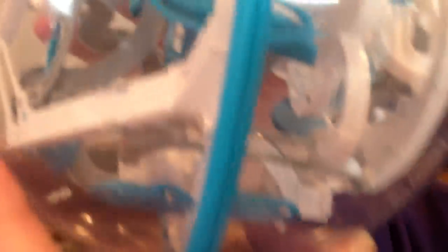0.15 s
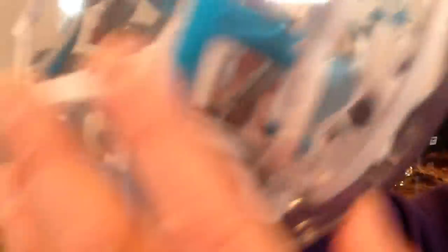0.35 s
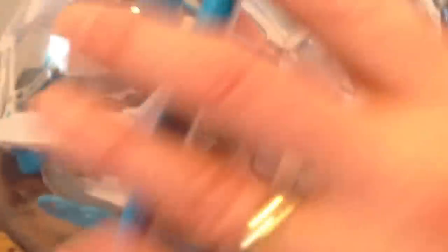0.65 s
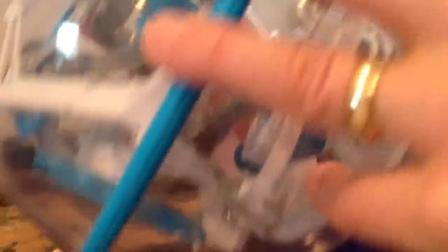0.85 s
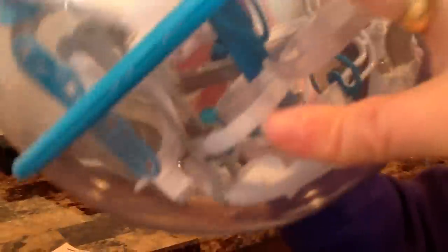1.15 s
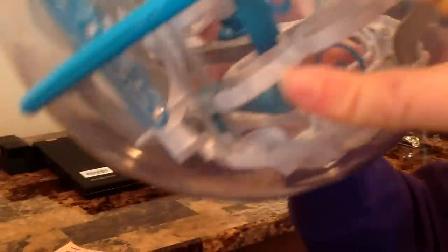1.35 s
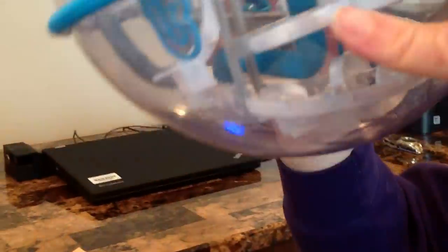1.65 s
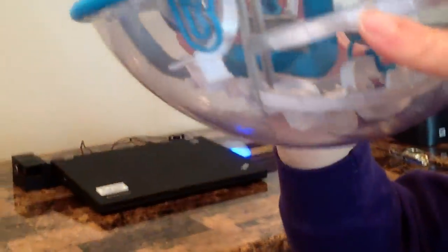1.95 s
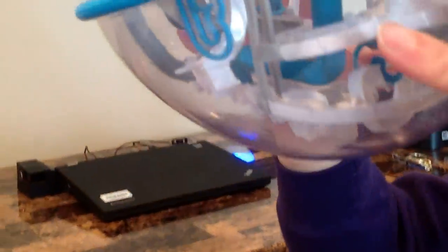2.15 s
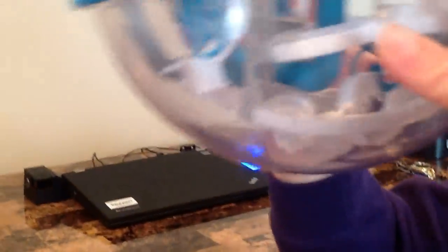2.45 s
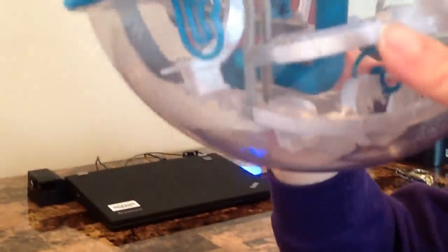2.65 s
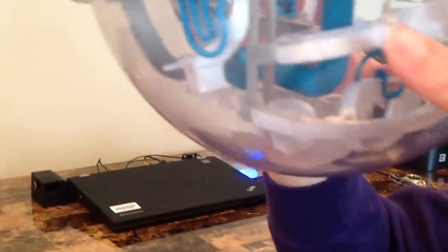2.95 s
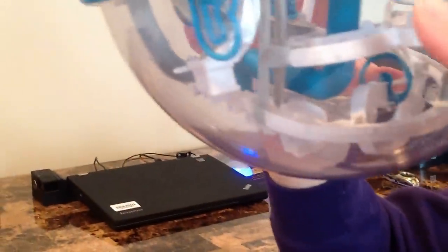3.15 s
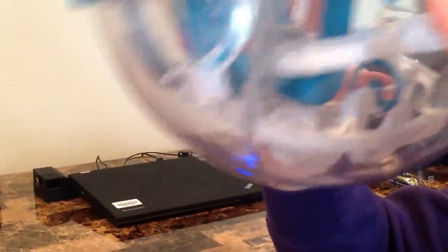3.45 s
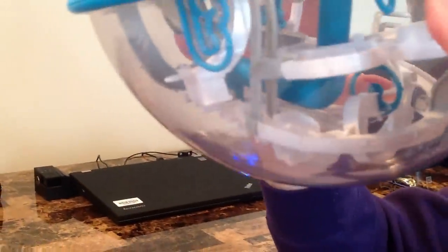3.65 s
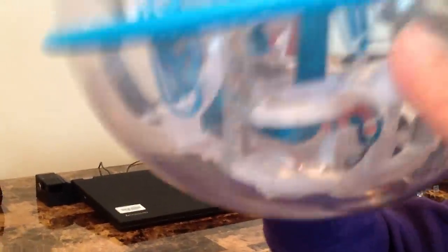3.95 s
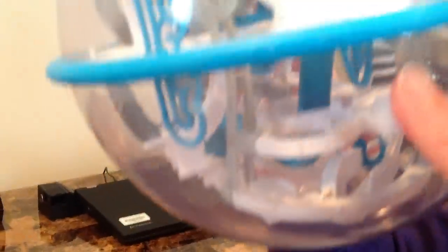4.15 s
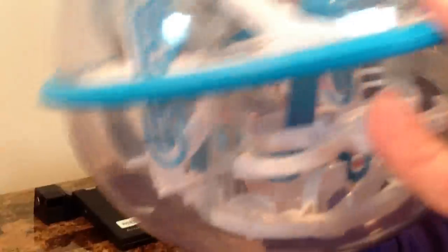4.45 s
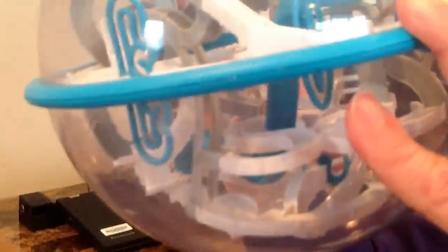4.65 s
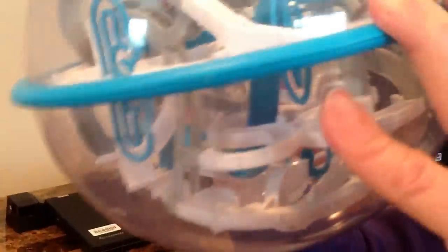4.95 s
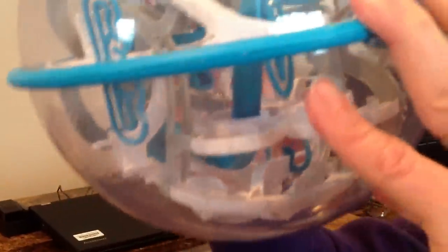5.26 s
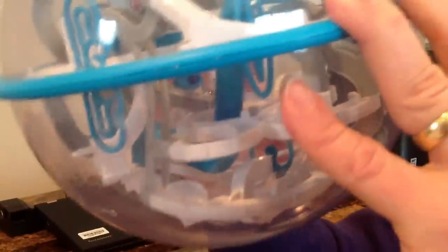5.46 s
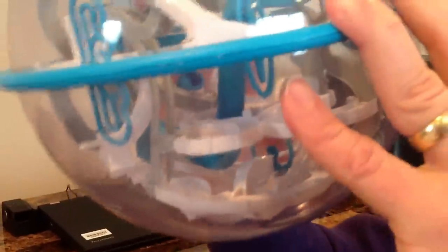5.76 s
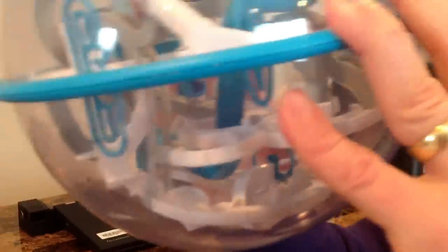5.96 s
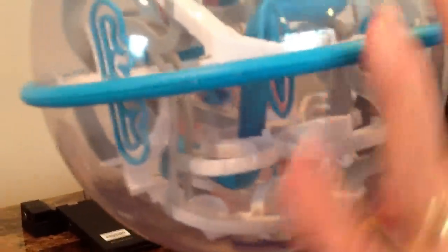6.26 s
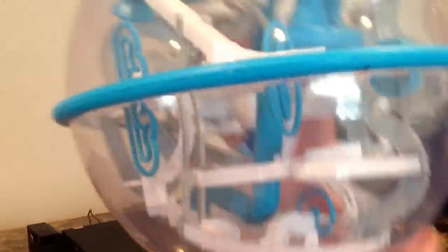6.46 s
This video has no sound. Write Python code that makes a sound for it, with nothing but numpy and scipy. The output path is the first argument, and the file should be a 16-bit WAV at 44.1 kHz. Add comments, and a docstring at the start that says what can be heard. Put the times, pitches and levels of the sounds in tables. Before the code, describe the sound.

Irregular hard plastic clacks and short rattling rolls of a ball in a hand-held maze ball, close up over steady faint hiss.

```python
"""A steel ball rolls and knocks inside a clear plastic maze sphere turned in the hands, close to a phone.
Each knock is a blow of shell modes and damped noise, coloured by the struck track; bounces follow it.
Rolling strings soft blows together. A hand changes its grip, mostly early on: fingers tick, rub and thud
as shaped noise and small skin contacts. A small, quiet room adds a short tail, steady hiss and a faint hum."""
import sys
import numpy as np
from scipy import signal
from scipy.fft import rfft, irfft, next_fast_len
from scipy.io import wavfile

SR = 44100
rng = np.random.default_rng(int(sys.argv[2]) if len(sys.argv) > 2 else 0)


def inscribe(sig):
    """Save sig as 16-bit PCM at rate SR to the path in sys.argv[1].

    A 1-D sig is mono; a 2-D sig holds one channel per row.
    Samples are clipped to [-1, 1] before scaling.
    """
    pcm = np.round(np.clip(np.atleast_2d(sig).T, -1, 1) * 32767)
    wavfile.write(sys.argv[1], SR, pcm.astype(np.int16))


N = 291819
BLOW_LENGTH = 5120  # samples in one blow or tick


def undb(db):
    """Decibels to gain."""
    return np.exp(np.asarray(db) * (np.log(10) / 20))


def unit(x, span=None):
    """Scale to rms 1 over the first span seconds, or over all."""
    head = x if span is None else x[:int(span * SR)]
    return x / np.sqrt(np.mean(head ** 2) + 1e-20)


def along(hz, points):
    """Read (Hz, value) points on a log-frequency axis."""
    point_hz, value = np.transpose(points)
    return np.interp(np.log(hz + 1), np.log(point_hz), value)


def colour(x, points):
    """Give a sound the spectrum of (Hz, dB) points in minimum phase, so nothing rings ahead of it."""
    size = 2 * next_fast_len(len(x) // 2 + 1)
    gain = undb(along(np.fft.rfftfreq(size, 1 / SR), points))
    # fold the cepstrum forward in time for minimum phase
    cepstrum = irfft(np.log(gain))
    cepstrum[1:size // 2] *= 2
    cepstrum[size // 2 + 1:] = 0
    response = np.exp(rfft(cepstrum))
    return irfft(rfft(x, size) * response, size)[:len(x)]


def add(track, s, sound):
    """Mix a sound into a track at time s."""
    i = int(np.clip(s * SR, 0, N - 1))
    track[i:i + len(sound)] += sound[:N - i]


def swell(t, length):
    """A smooth rise and fall over length seconds."""
    return np.sin(np.pi * np.clip(t / length, 0, 1))


def ring_track(x, rings_hz, q):
    """A track is resonant: sum the sound through one peak filter per ring frequency."""
    return sum(signal.lfilter(*signal.iirpeak(hz, q, fs=SR), x) for hz in rings_hz)


def grains(rate, spread_db):
    """One second of tiny contacts, rate per second on average, of uneven size and spacing."""
    gap = rng.random(SR // 8)
    side, strength = rng.standard_normal((2, SR // 8))
    at = (np.cumsum(2 * gap) * SR / rate).astype(int)
    return np.bincount(at, np.sign(side) * undb(spread_db * strength), SR)[:SR]


# Still air and microphone hiss. Each row: frequency in Hz, relative density in dB per Hz.
AIR_SPECTRUM = [(25, -51), (60, -25), (90, -18), (125, -6), (200, -2), (310, -3.5), (450, -6), (1000, -9),
                (2900, -12), (6000, -14), (11000, -14), (15500, -19)]
AIR_DB = -62.5
HUM_HZ, HUM_DB = 118.2, -80.5


def background(waver=0.97):
    """Steady coloured hiss and a faint sine hum whose phase wanders (waver in radians)."""
    t = np.arange(N) / SR
    drift = np.interp(t, np.linspace(0, t[-1], 40), rng.standard_normal(40))
    hum = np.sin(2 * np.pi * HUM_HZ * t + waver * drift)
    hiss = colour(rng.standard_normal(N), AIR_SPECTRUM)
    return undb(AIR_DB) * unit(hiss) + undb(HUM_DB) * unit(hum)


def dying_noise(spectrum, t60s, size):
    """A diffuse tail: half-octave bands of noise, each with its own energy and decay."""
    t, f = np.arange(size) / SR, np.fft.rfftfreq(size, 1 / SR)
    noise, out = rfft(rng.standard_normal(size)), 0
    for hz in 2 ** np.arange(6, 14.5, .5):
        fade = undb(-60 * t / along(hz, t60s))
        in_band = abs(np.log2((f + 1) / hz)) < .25
        band = irfft(noise * in_band, size) * fade
        energy_gain = np.sqrt(hz * np.mean(fade ** 2))  # wider and longer bands hold more energy
        out = out + unit(band) * energy_gain * undb(along(hz, spectrum))
    return out


# Tone of the room tail. Each row: frequency in Hz, relative level in dB.
ROOM_SPECTRUM = [(60, -3), (160, 8.5), (350, 4.5), (700, 5.5), (1200, -4), (2200, -3), (3200, -2),
                 (8000, 0), (15000, -35)]
# Decay of the room tail. Each row: frequency in Hz, time to fall 60 dB in seconds.
ROOM_DECAY = [(150, 0.36), (500, 0.33), (1500, 0.45), (4000, 0.32), (12000, 0.17)]


def room(x, wet_db=-12, gap_s=0.018):
    """Counter and walls answer with a short, dull tail that fades in over some milliseconds."""
    tail = dying_noise(ROOM_SPECTRUM, ROOM_DECAY, SR // 2)
    tail *= 1 - np.exp(-(np.arange(len(tail)) / SR / gap_s) ** 2)
    middle = abs(rfft(tail, SR))[800:2400]  # wet_db is the tail's gain from 800 to 2400 Hz
    return x + undb(wet_db) * signal.oaconvolve(x, tail / np.sqrt(np.mean(middle ** 2)))[:N]


# The hand lands on the shell. Each row: start in seconds, length of the push in seconds,
# thud level in dB, skin hiss level in dB (both averaged over the push).
GRIPS = [(0.993, 0.02, -54, -58), (1.073, 0.12, -55, -57.5), (1.214, 0.081, -55.5, -50),
         (1.532, 0.056, -47, -47), (1.661, 0.033, -55, -81), (3.15, 0.087, -69, -69)]
# Soft palm on the shell. Each row: frequency in Hz, relative density in dB per Hz.
THUD_SPECTRUM = [(30, -35), (70, -19), (130, -3.5), (260, 1.5), (400, -6.5), (900, -11), (2500, -32)]
# Skin rubbing on plastic. Each row: frequency in Hz, relative density in dB per Hz.
SKIN_SPECTRUM = [(200, -42.5), (900, 12.5), (2200, 7), (5000, -5.5), (9000, -15), (15500, -34)]
SLIDE_DB, SLIDE_FADE_S = -13.5, 0.15  # slide against the push's peak; time constant of its fade


def hand(rate=1400, spread_db=5):
    """Skin sticks and slips on the plastic while the soft palm thuds; it then slides on and comes to rest."""
    out, t = np.zeros(N), np.arange(SR) / SR
    for s, length, thud_db, hiss_db in GRIPS:
        slide = undb(SLIDE_DB) * np.exp(-np.maximum(t - length, 0) / SLIDE_FADE_S)
        slide *= t > length / 2  # only after the push has peaked
        slips = grains(rate, spread_db) * np.maximum(swell(t, length), slide)
        add(out, s, undb(thud_db) * unit(colour(slips, THUD_SPECTRUM), length))
        add(out, s, undb(hiss_db) * unit(colour(slips, SKIN_SPECTRUM), length))
    return out


# Modes of the shell and its tracks, before each blow scatters them.
# Each row: frequency in Hz, relative level in dB, time to fall 60 dB in seconds.
SHELL_MODES = [(237, -17, 0.12), (331.3, -19, 0.2), (564.7, -18.5, 0.17), (759.6, -13, 0.088),
               (955, -2.5, 0.07), (1022, -5.5, 0.031), (1147, -10, 0.062), (1186, -10, 0.1),
               (1304, -2.5, 0.079), (1429, -8.5, 0.19), (1770, -23, 0.051), (1752, -5, 0.12),
               (1884, -10, 0.13), (2150, 0.5, 0.081), (2196, 0.5, 0.042), (2555, -3.5, 0.057),
               (2638, -3.5, 0.06), (3100, -29, 0.072), (3152, -6.5, 0.09), (3570, -29, 0.29),
               (4004, -11.5, 0.072), (4140, -18, 0.16), (6190, -15, 0.11), (8250, -10.5, 0.049)]
# The crowd of small, quickly damped modes. Each row: frequency in Hz, relative density in dB per Hz.
CLACK_SPECTRUM = [(100, -23), (200, -9), (450, -12.5), (750, -4.5), (1050, 2.5), (2000, -1), (2350, -5),
                  (2600, -16), (2900, -9), (4200, -10), (5500, -14), (10500, -15.5), (12000, -22.5),
                  (15500, -20)]


def shell(clack_db=2, clack_t60_s=0.12, scatter_db=3.0, detune=0.0035, snap_db=4, snap_s=0.0039,
          radiate_hz=140, damp_hz=2800, treble_s=0.03):
    """One blow: a hard snap, then the hollow ring; the place struck decides how each mode answers."""
    t = np.arange(BLOW_LENGTH) / SR
    hz, db, t60 = np.transpose(SHELL_MODES)[:, :, None]
    strength, shift, side = rng.standard_normal((3, len(SHELL_MODES), 1))
    fade = undb(db + scatter_db * strength - 60 * t / t60)
    ring = np.sin(2 * np.pi * hz * (1 + detune * shift) * t)
    modes = np.sum(np.sign(side) * fade * ring, axis=0)
    snap = undb(snap_db * np.exp(-(t / snap_s) ** 4) - 60 * t / clack_t60_s)
    clack = colour(rng.standard_normal(BLOW_LENGTH) * snap, CLACK_SPECTRUM)
    # plastic damps the treble first
    dull = signal.lfilter(*signal.butter(1, damp_hz, fs=SR), clack)
    clack = dull + (clack - dull) * np.exp(-t / treble_s)
    blow = unit(modes, .01) + undb(clack_db) * unit(clack, .01)
    # a small shell radiates little bass
    return signal.lfilter(*signal.butter(2, radiate_hz, "high", fs=SR), blow)


# Short ticks on the shell: a finger or its ring, but the last row is a tick of the ball. Each row: start in
# seconds, level in dB over the tick's first 2 ms.
TICKS = [(0.553, -35), (0.900, -48.5), (0.999, -40), (1.2314, -56), (1.2967, -37.5), (1.546, -47),
         (1.668, -52.5), (5.5122, -40)]
# Colour of a tick. Each row: frequency in Hz, relative density in dB per Hz.
TICK_SPECTRUM = [(40, -28), (200, 6), (1200, 11), (3000, 10.5), (6000, -0.5), (15500, 0.5)]


def ticks(tick_s=0.0011, ring_db=-7):
    """Very short, bright noise contacts with a weaker ring of the shell under them."""
    out, t = np.zeros(N), np.arange(BLOW_LENGTH) / SR
    for s, db in TICKS:
        tick = colour(rng.standard_normal(BLOW_LENGTH) * np.exp(-t / tick_s), TICK_SPECTRUM)
        add(out, s, undb(db) * (unit(tick, .002) + undb(ring_db) * unit(shell(), .01)))
    return out


# Run-up level in dB for a knock at RUN_AT_KNOCK_DB, and its rise per dB of louder knock.
RUN_DB, RUN_AT_KNOCK_DB, RUN_DB_PER_DB = -52.5, -26, 0.62
TIP_SHARE = 0.52  # part of the run taken by the bump as the ball tips off its rest
GATHER_DB, GATHER_POWER = 2.5, 2.2  # roll at the wall against the bump; force grows as this power of time
# One long roll while the sphere is swung round. Each row: time in seconds, force level in dB.
LONG_ROLL = [(0, -57), (0.05, -66), (0.25, -59.5), (0.33, -54), (0.4, -43.5), (0.44, -58), (0.53, -57),
             (0.62, -68)]
# The two rings of the track the long roll follows [Hz].
LONG_ROLL_RINGS = (1090, 1360)


def roll(force, rings_hz, rate=220, contact_hz=1700, spread_db=5.0, track_db=3, track_q=6, count=2):
    """Small bumps are soft blows on one of two places along a track; the rumble has the force's energy."""
    bumps = sum(signal.fftconvolve(grains(rate / count, spread_db) * force, shell()) for _ in range(count))
    track = ring_track(bumps, rings_hz, track_q)
    rumble = signal.lfilter(*signal.butter(2, contact_hz, fs=SR), bumps + undb(track_db) * track)
    return unit(rumble) * np.sqrt(np.sum(force ** 2) / len(rumble))


def rolling():
    """Before each knock the ball tips off its rest and gathers force; louder knocks get louder runs."""
    out, t = np.zeros(N), np.arange(SR) / SR
    for s, knock_db, low_hz, high_hz, _, run_s, _, _ in KNOCKS:
        tip = swell(t, TIP_SHARE * run_s)
        gather = undb(GATHER_DB) * (t / run_s) ** GATHER_POWER * (t < run_s)
        run_db = RUN_DB + RUN_DB_PER_DB * (knock_db - RUN_AT_KNOCK_DB)
        add(out, s - run_s, undb(run_db) * roll(tip + gather, (low_hz, high_hz)))
    times, db = np.transpose(LONG_ROLL)
    long_force = undb(np.interp(t, times, db)) * (t < times[-1])
    add(out, 0, roll(long_force, LONG_ROLL_RINGS))
    return out


# The ball runs into a wall and bounces. Each row: knock time in seconds, level in dB over the first 10 ms,
# lower and upper ring of the struck track in Hz, hardness of the contact as a cut-off in Hz,
# run-up in seconds, time between bounces in seconds, first bounce in dB against the knock.
KNOCKS = [ (0.041, -50.5, 1240, 2370, 3410, .006, .105, -8),
          (0.276, -42.5, 1270, 1980, 5200, .002, 0.029, -7),
          (0.405, -33.5, 1120, 1410, 8150, 0.1, 0.047, -6.5),
          (0.414, -34, 1400, 1930, 4000, 0.048, 0.0078, -5.5),
          (0.550, -37, 1710, 3600, 15000, 0.038, 0.041, -14.5),
          (0.767, -51.5, 1380, 2352, 3870, 0.066, 0.028, -12),
          (1.231, -40, 1080, 3160, 5450, .02, 0.023, -17),
          (1.402, -46.5, 1100, 1990, 3000, .006, 0.06, -13),
          (1.413, -38.5, 1080, 2070, 4400, 0.014, .008, -5),
          (2.61, -33.5, 1020, 1390, 2710, .072, 0.052, -24),
          (2.9176, -34, 1090, 1280, 2340, 0.06, 0.095, -28),
          (3.611, -36.5, 1090, 1740, 2000, 0.016, 0.0089, -1),
          (3.6143, -24.5, 1880, 2610, 10800, 0.087, 0.026, -24),
          (4.1127, -23, 1140, 1830, 11100, 0.096, 0.18, -29.5),
          (4.6627, -30.5, 1580, 1810, 5030, 0.12, 0.029, -17),
          (4.956, -57.5, 1200, 2200, 2800, .006, 0.038, -2.5),
          (5.0797, -23, 1410, 2270, 9500, 0.079, .153, -23.5),
          (5.484, -47.5, 1000, 2200, 3000, .006, .011, -2),
          (5.5058, -36, 970, 1490, 10000, 0.051, 0.0037, 0.5),
          (5.5137, -25, 930, 1530, 12000, 0.075, 0.044, -15.5),
          (5.984, -40.5, 980, 1420, 3300, .002, 0.016, -12),
          (6.004, -27, 1320, 1690, 4860, 0.072, 0.086, -3.5),
          (6.0165, -28, 1260, 2520, 8250, 0.014, 0.097, -14.5),
          (6.327, -51, 1480, 2080, 3500, .015, 0.013, -3), (6.357, -49, 970, 2320, 4080, 0.021, .012, -6)]
BOUNCE_CONTACT_HZ = 2380  # cut-off shared by all bounces


def knocks(track_db=-0.5, track_q=7, first_db=-2.0, first_s=0.0028, count=3):
    """Steel on plastic: the struck track colours the blow, contact hardness sets its brightness; two bounces follow."""
    out, t = np.zeros(N), np.arange(BLOW_LENGTH) / SR
    onset = undb(first_db * np.exp(-(t / first_s) ** 4))  # holds back the first few milliseconds a little
    for s, db, low_hz, high_hz, contact_hz, _, bounce_s, bounce_db in KNOCKS:
        for k in range(count):  # 0 is the knock itself
            blow = shell() * onset
            track = ring_track(blow, (low_hz, high_hz), track_q)
            contact = signal.butter(2, BOUNCE_CONTACT_HZ if k else contact_hz, fs=SR)
            sound = unit(signal.lfilter(*contact, blow + undb(track_db) * track), .01)
            # the level step in dB grows with the square of the bounce number
            add(out, s + k * bounce_s, undb(db + bounce_db * k ** 2) * sound)
    return out


def scene():
    """Ball and hand sound through the sphere into the room, over the background."""
    close = knocks() + rolling() + ticks() + hand()
    return (room(close) + background())[None]


def record(dry, top_hz=15600):
    """The phone cuts the top with a steep low-pass."""
    return signal.sosfilt(signal.ellip(10, .2, 70, top_hz, fs=SR, output="sos"), dry)


dry = scene()
out = record(dry)
inscribe(out)
```